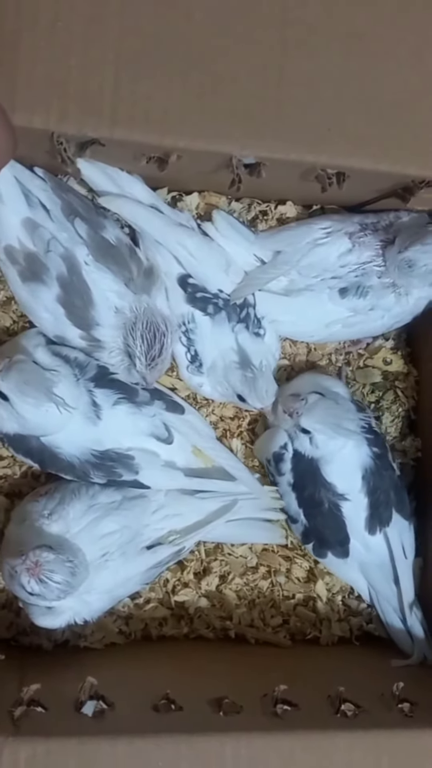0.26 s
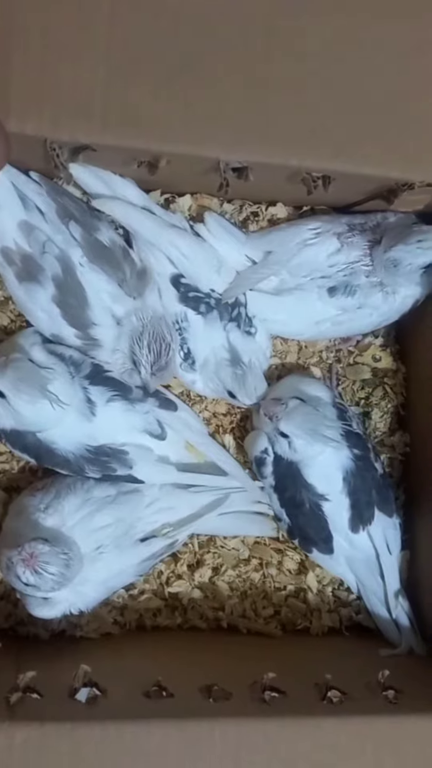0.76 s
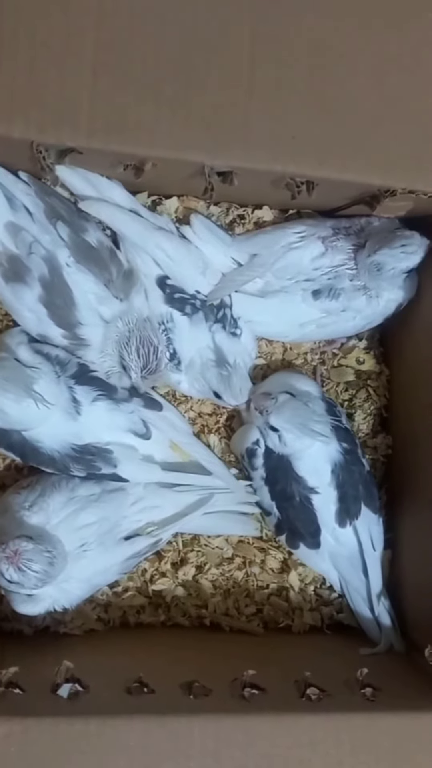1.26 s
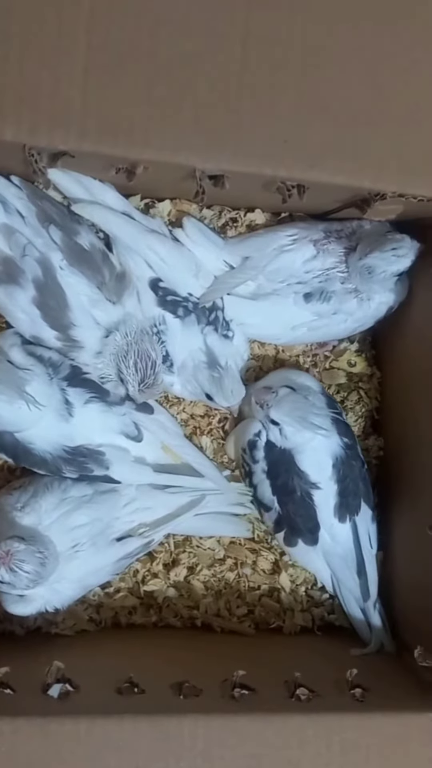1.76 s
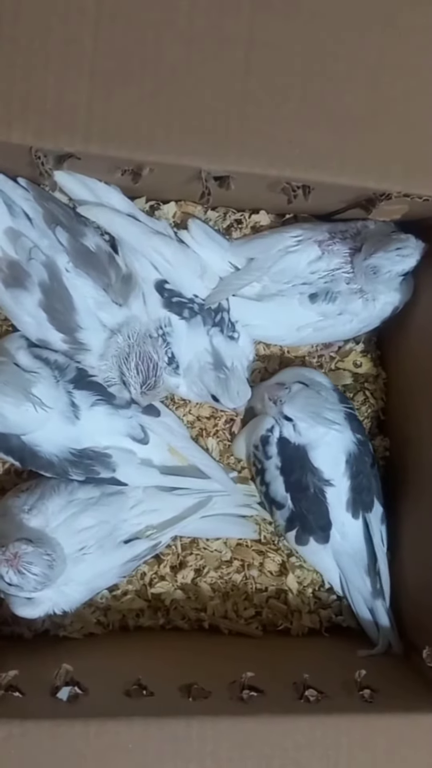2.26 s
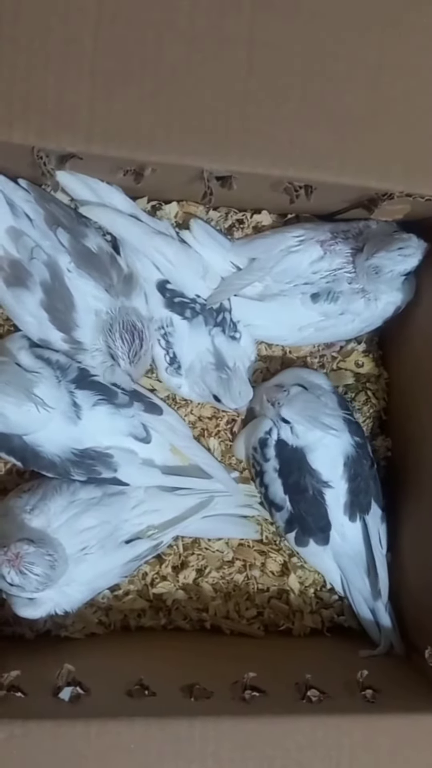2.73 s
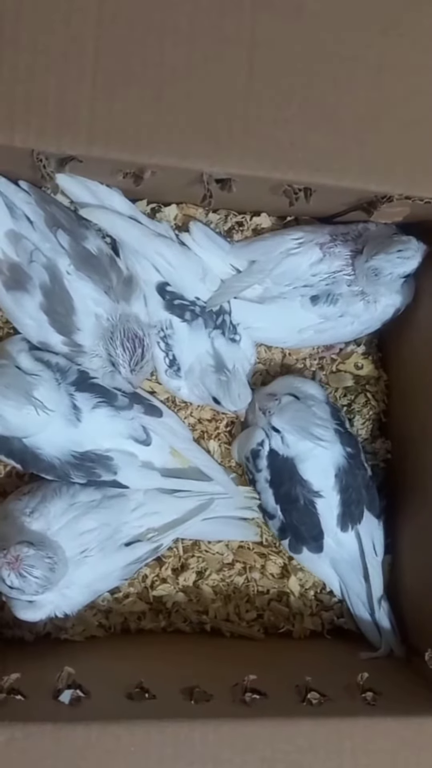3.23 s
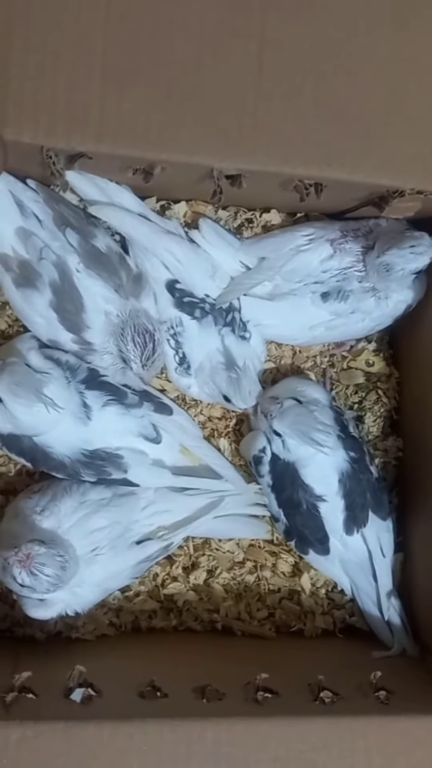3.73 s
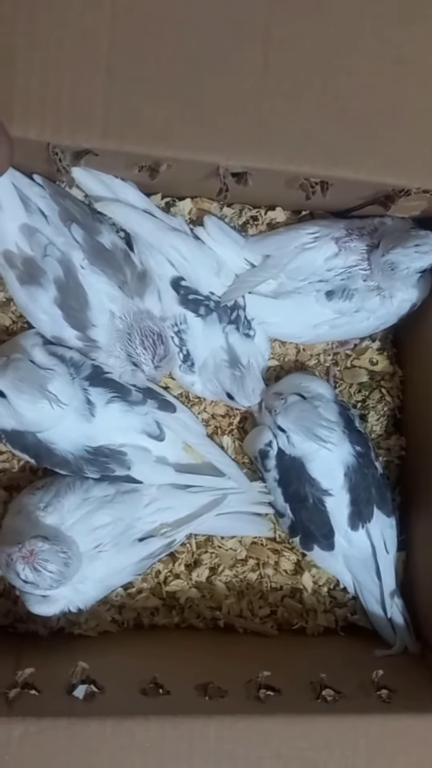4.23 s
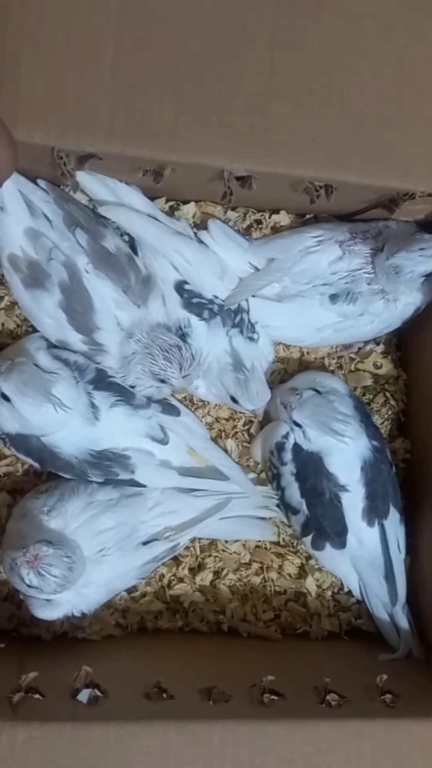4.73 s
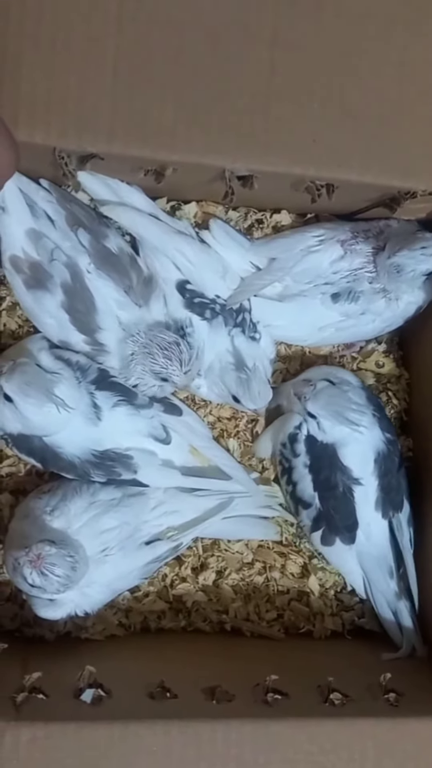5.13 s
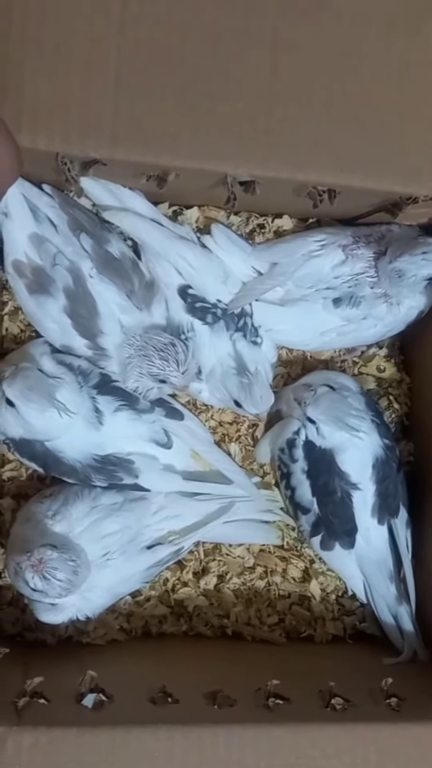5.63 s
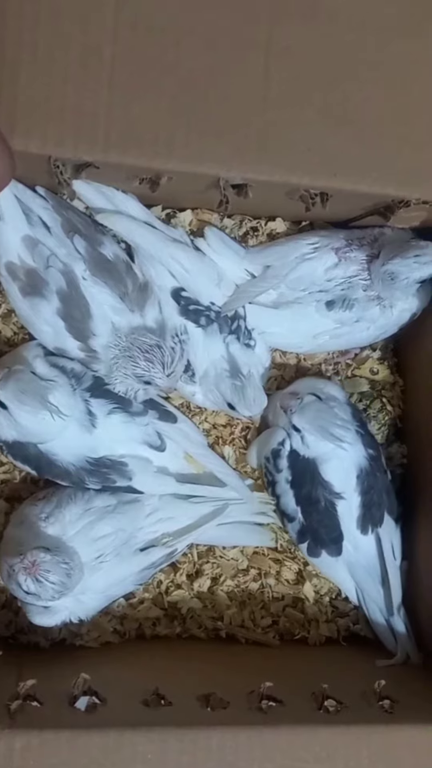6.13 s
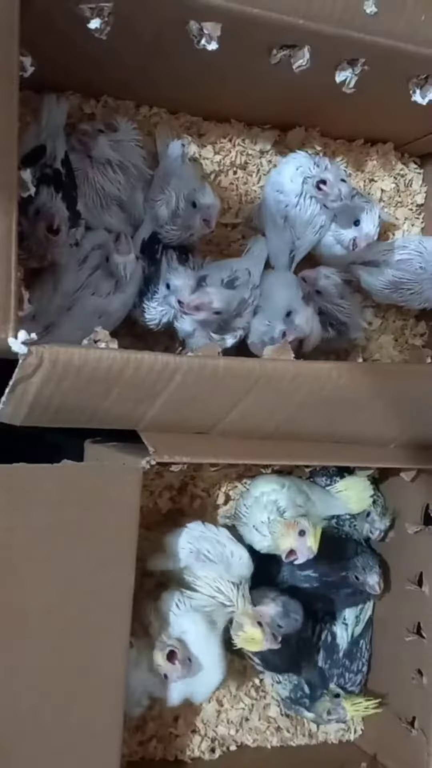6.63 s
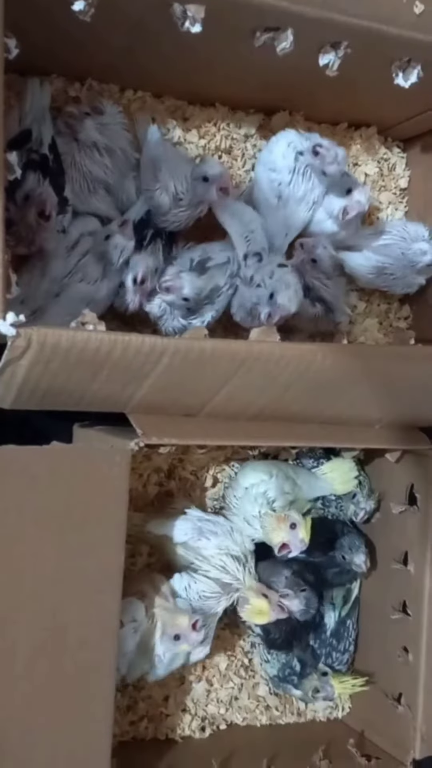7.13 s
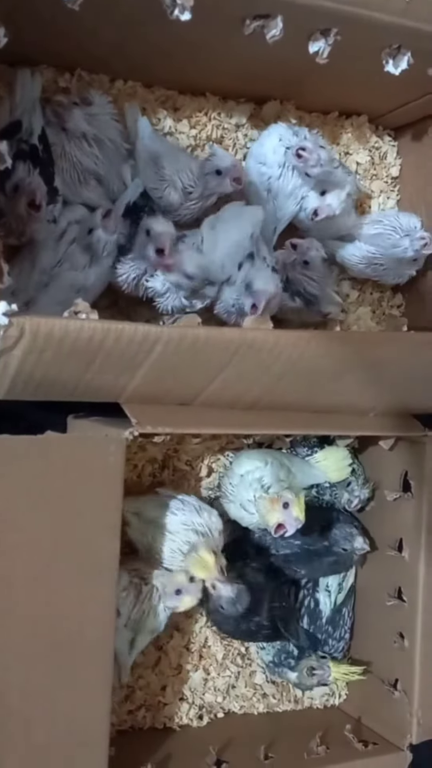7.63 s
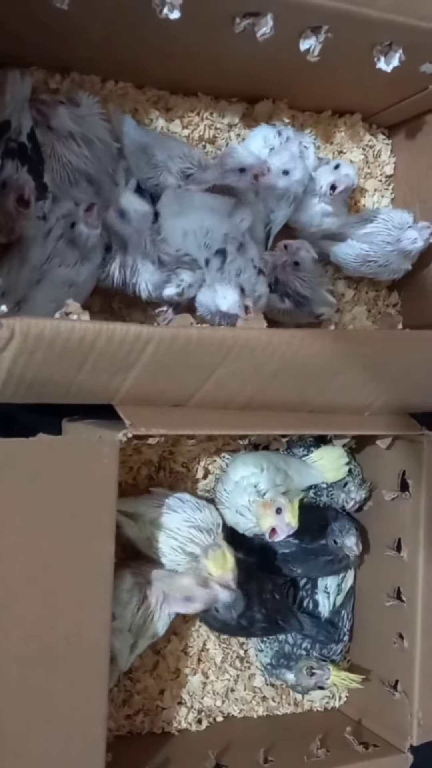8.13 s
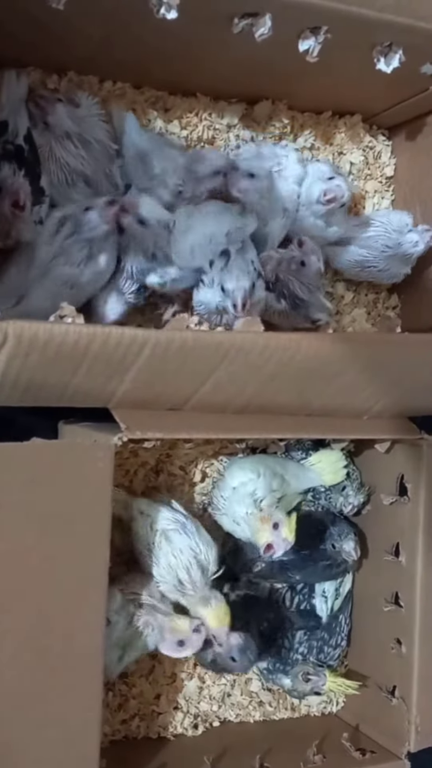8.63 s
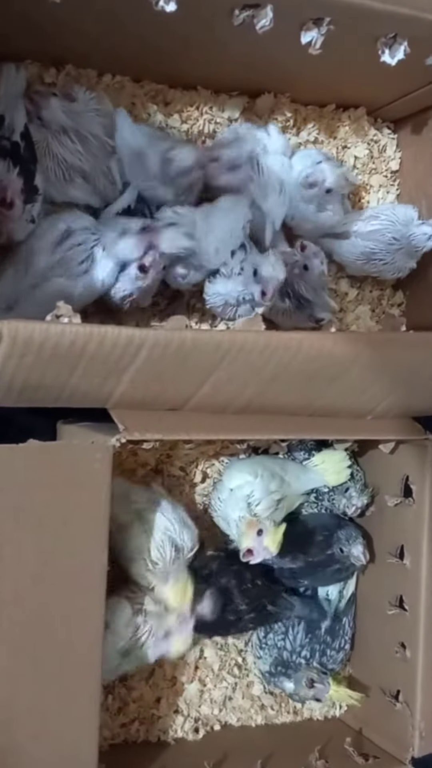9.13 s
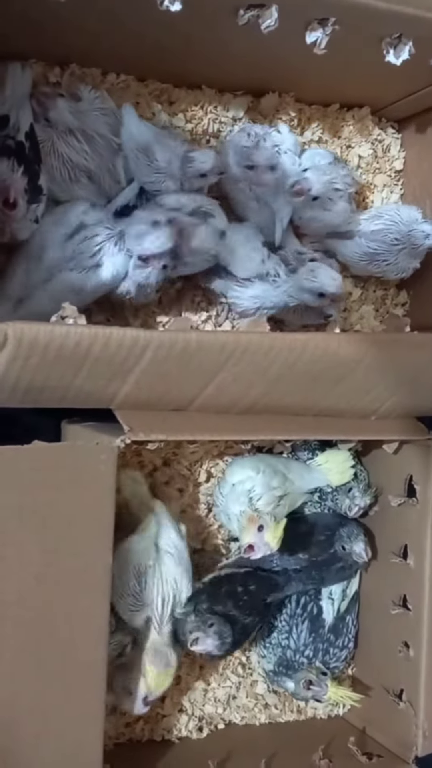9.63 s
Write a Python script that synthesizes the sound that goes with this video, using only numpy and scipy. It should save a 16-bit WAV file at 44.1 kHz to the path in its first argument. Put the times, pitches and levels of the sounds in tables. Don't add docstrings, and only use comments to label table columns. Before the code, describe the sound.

From the start, parrot chicks in a cardboard box beg at close range with overlapping hoarse, fluttering rasps, like fast rattling wheezes, low-throated and shrill together. A falling chirp and beak tick come at about 0.6 s; the chorus surges, then weakens after 2.4 s. Near 2.9 to 3.1 s short peeps glide up and down. From 3.1 to 3.9 s the nearest chick squalls four times, each begun by a sharp falling whistle and beak snap, the last longest. Rasping rebuilds from 3.9 s with thin peeps around 4.2 to 4.5 s, a lone squall at 5.3 s, and a clipped one at 6.45 s. Silence falls around 6.55 s. From about 6.65 s to the end, a farther, quieter crowd rasps steadily, easing around 8.4 s, with brief calls, faint chirps, airy hiss and low hum. Mains hum, fan tone and rumble lie faintly beneath the first part.

```python
import sys
import numpy as np
from scipy import signal
from scipy.fft import rfft, irfft, next_fast_len
from scipy.io import wavfile
from scipy.ndimage import uniform_filter1d, map_coordinates

SR = 44100
rng = np.random.default_rng(int(sys.argv[2]) if len(sys.argv) > 2 else 0)


def generate_wav(signal):
    frames = np.transpose(np.atleast_2d(signal))
    scaled = np.clip(frames, -1, 1) * 32767
    pcm = np.round(scaled).astype(np.int16)
    wavfile.write(sys.argv[1], SR, pcm)


def invert_db(x):
    u = np.asarray(x, float) / 20
    return 10 ** u


N = 436149
SECOND_VIEW_S = 6.58
SIDES = np.array([[1], [-1]])


def unit(x):
    return x / np.sqrt(np.mean(np.atleast_2d(x).mean(0) ** 2) + 1e-20)


def along(points, hz):
    f, v = np.transpose(points)
    return np.interp(np.log(hz + 1), np.log(f + 1), v)


def curves(rows, t=None):
    s, *cols = np.transpose(np.vstack(rows))
    t = np.arange(N) / SR if t is None else t
    return [np.interp(t, s, c) for c in cols]


def wobble(rate):
    knots = rng.standard_normal(int(N * rate / SR) + 4)
    return map_coordinates(knots, [np.arange(N) * rate / SR], order=1)


def filtered(x, response):
    m = next_fast_len(N + 4096)
    return irfft(rfft(x, m) * response(np.fft.rfftfreq(m, 1 / SR)), m)[..., :N]


def ports(x, lead_s, pan_db):
    return filtered(x, lambda f: invert_db(SIDES * pan_db / 2) * np.exp(1j * np.pi * f * lead_s * SIDES))


# (time [s], level [dB])
HUM_SWELL = [
    [(0.0, -73.5), (0.31, -85.5), (0.34, -68), (0.91, -53), (2.23, -62.5), (3.05, -51.5)],
    [(3.65, -56.5), (3.92, -48), (4.67, -71.5), (5.59, -48), (6.41, -54.5), (6.5, -75)],
    [(6.7, -53), (6.98, -59), (7.15, -50), (7.28, -55.5), (9.75, -55.5), (9.89, -63.5)],
]
# (frequency [Hz], density [dB per Hz])
RUMBLE_SPECTRUM = [(15, -41.5), (28, -35), (69, -8.5), (96, -6.5), (124, -0.5), (147, 0), (201, -8.5),
                   (465, -4), (520, -20), (580, -23), (690, -13), (900, -19), (1170, -29), (1980, -120)]
# (frequency [Hz], level [dB], left-right [dB])
FAN_TONES = [
    (448, -57.5, 4),
    (224.8, -65, 0),
]
MAINS_HZ, DRONE_HZ, DRONE_DB = 120, 70, -78.5
RUMBLE_DB, RUMBLE_FAR_DB, RUMBLE_FOLLOWS = -58, -62.5, 0.24
DUCK_DB, DUCK_S, DUCK_LATE_S = -11, 0.036, 0.0044


def room():
    t = np.arange(N) / SR
    second = t > SECOND_VIEW_S
    duck_db = DUCK_DB * sum(np.exp(-((t - s + DUCK_LATE_S) / DUCK_S) ** 2) for s, *_ in SOLO)
    swell_db, = curves(HUM_SWELL)
    hum_phase = 2 * np.pi * MAINS_HZ * t + .7 * wobble(6)
    hum = invert_db(swell_db + duck_db - 2.5) * np.sqrt(2) * np.sin(hum_phase)

    blades = 0
    for hz, db, pan_db in FAN_TONES:
        level = invert_db(db + 1.9 * wobble(4.0) + pan_db * SIDES)
        blades = blades + level * np.sqrt(2) * np.sin(2 * np.pi * hz * t + 0.1 * wobble(3.9))
    buzz = invert_db(-66.5) * np.sin(2 * np.pi * 306.8 * t) * second * (t < 8.3)

    mid, side = filtered(rng.standard_normal((2, N)), lambda f: invert_db(along(RUMBLE_SPECTRUM, f)))
    rumble = unit(np.array([mid + 0.2 * side, mid - 0.6 * side]))
    rumble_db = np.where(second, RUMBLE_FAR_DB, RUMBLE_DB)
    rumble_db = rumble_db + RUMBLE_FOLLOWS * (swell_db - swell_db.mean()) + duck_db
    street = rng.standard_normal((2, N)) + 2.9 * mid
    drone = unit(filtered(street, lambda f: f / (30 + f) / (1 + (f / DRONE_HZ) ** 4)))
    drone = invert_db(DRONE_DB) * second * drone
    return drone + hum + blades * (t < SECOND_VIEW_S) + buzz + invert_db(rumble_db + 3.5) * rumble


def flutter(rate, scatter_db, breath, clack):
    wavering_hz = rate * invert_db(1.8 * wobble(4) + .8 * wobble(90))
    beats = np.floor(np.cumsum(wavering_hz / SR))
    slaps = np.diff(beats, prepend=0) * invert_db(scatter_db * rng.standard_normal(N))
    puffs = signal.lfilter([1], [1, -np.exp(-1 / (.0007 * SR))], slaps)
    air = unit((breath + unit(puffs)) * rng.standard_normal(N))
    return unit(air + clack * unit(slaps))


# (time [s], crop [Hz], windpipe [Hz], beak [Hz], left-right [dB])
MOUTH_RINGS = [(0.0, 2525, 4350, 5050, 3.5), (0.59, 1830, 4080, 4820, 5.5), (0.81, 2550, 3840, 4950, -2.5),
               (1.36, 2340, 4170, 4280, -3), (1.65, 2120, 4220, 5780, 1), (2.47, 2220, 4010, 5420, -5.5),
               (2.76, 1514, 4130, 5660, 5), (3.08, 1930, 4200, 5480, 3.5), (3.14, 2650, 3600, 5060, -6),
               (3.8, 2250, 3920, 4830, -19.5), (3.88, 2240, 4090, 4950, -1.5), (4.8, 1925, 4340, 5180, 0.5),
               (5.4, 2155, 3690, 5220, 0), (5.8, 1950, 4350, 6060, -1.5), (6.5, 1914, 4000, 5290, 4.5),
               (8.32, 1980, 4360, 6200, 17), (9.11, 1965, 3980, 5180, 2.5), (9.89, 1790, 4020, 5500, 4.5)]
SHARP_DB, SHARP_WAVERS_DB = 3.5, 0.5


def throat(z, spectrum, column, width_hz, ring_db, patchy_db):
    hz, t = np.fft.rfftfreq(512, 1 / SR), np.arange(z.shape[-1]) * 256 / SR
    ring_hz = curves(MOUTH_RINGS, t)[column]
    at = np.minimum(np.int64(t * SR), N - 1)
    peak = invert_db(ring_db + SHARP_DB + SHARP_WAVERS_DB * wobble(2.6)[at])
    ring = peak / (1 + ((hz[:, None] - ring_hz) / width_hz) ** 2) ** 2
    field = uniform_filter1d(rng.standard_normal(z.shape[-2:]), size=16, axis=1)
    streaks = invert_db(patchy_db * np.where(t > SECOND_VIEW_S, .7, 1) * field / field.std())
    gain = invert_db(along(spectrum, hz))[:, None] * (1 + ring) * streaks
    gain /= np.sqrt(np.mean(gain ** 2, axis=0))
    return unit(signal.istft((z * gain).astype(np.complex64), SR, nperseg=512)[1][:, :N])


ATTACK_S, SHRILL_ATTACK_S, RELEASE_S = .012, 0.0062, 0.012


def calls(rows, colour=None, attack_s=ATTACK_S):
    power = np.zeros(N)
    for row in rows:
        s, end, db, swell_db = row[:4]
        length = end - s
        t = np.arange(round((length + RELEASE_S) * SR)) / SR
        opening = t / attack_s + (s <= 0)
        closing = 1 + (length - t) / RELEASE_S
        edge = np.clip(np.minimum(opening, closing), 0, 1)
        level_db = db + swell_db * (t / length - .5) + (row[colour] if colour else 0)
        span = power[round(max(s, 0) * SR):][:len(t)]
        span += (edge * invert_db(level_db))[:len(span)] ** 2
    return power


# (start [s], end [s], level [dB], swell [dB], chest tone [dB])
DEEP_CALLS = [(0.0, .62, -30.5, -2.5, -3.5), (.615, 1.54, -33.5, 4, -3.5), (1.53, 1.745, -33.5, -4.5, 0.5),
              (1.735, 2.43, -33.5, 2, 2.5), (2.415, 2.67, -37, 5, 1), (2.675, 2.935, -40, -2, 5),
              (2.93, 3.09, -47, -2, -1.5), (3.12, 3.25, -44, 4.5, -5), (3.28, 3.395, -51, 13.5, -0.5),
              (3.48, 3.56, -51, 4.5, 11), (3.67, 3.785, -41, -10.5, -8.5), (3.78, 4.015, -35.5, 2, -1.5),
              (4.01, 4.17, -43.5, -5.5, -5), (4.16, 4.555, -35.5, 8, -2), (4.545, 5.285, -33.5, -2, 3),
              (5.285, 5.45, -37.5, 16.5, -5), (5.44, 5.62, -37.5, 8.5, -2.5), (5.615, 5.66, -43.5, 0.5, -2),
              (5.655, 6.425, -34.5, 3.5, -3), (6.43, 6.515, -37, -2, -6.5)]
# (start [s], end [s], level [dB], swell [dB], windpipe over beak [dB])
SHRILL_CALLS = [(0.0, .43, -31, -1, 1), (.432, .622, -28.5, 2, -0.6), (.625, .82, -38, -5, 0),
                (.822, .915, -36, 2.5, -6), (.92, 1.5, -33, 5, -7.5), (1.502, 1.735, -35.5, -7, -5),
                (1.737, 2.43, -34.5, 1.5, -2), (2.435, 2.672, -37, 11, -1.5), (2.678, 2.895, -43, -4, -0.5),
                (2.904, 2.937, -29, -3, -5.5), (2.94, 3.085, -41, -5, -6), (3.855, 4.015, -34, 2.5, -9.5),
                (4.02, 4.165, -48.5, 2.5, -8.5), (4.168, 4.545, -37.5, 10.5, -1),
                (4.55, 5.105, -34.5, 3.5, -0.3), (5.108, 5.24, -32, -3.5, -3.5),
                (5.243, 5.267, -34.5, 1.5, -5), (5.273, 5.284, -21.5, -3, -9.5),
                (5.458, 5.62, -36.5, 3.5, -8), (5.615, 5.64, -49.5, -7.5, -2.5),
                (5.659, 5.667, -26.5, 1, -11.5), (5.672, 5.705, -32.5, -0.5, -11.5),
                (5.707, 5.785, -39.5, -2.5, -3.5), (5.787, 6.3, -30, 6, -8), (6.302, 6.41, -31.5, -8, -2.5),
                (6.412, 6.43, -28, 9.5, -4)]
# (time [s], level [dB])
FAR_CLAMOUR = [(6.6, -46.5), (6.8, -44), (7.1, -43), (7.95, -42.5), (8.4, -48.5), (8.85, -46), (9.2, -44.5),
               (9.89, -46)]
# (start [s], end [s], level [dB], swell [dB])
FAR_BOX_CALLS = [(8.0, 8.05, -54.5, -8), (8.07, 8.112, -55, 7), (8.17, 8.19, -44.5, -4.5),
                 (8.22, 8.257, -49, 8), (8.33, 8.35, -45, -7), (8.49, 8.56, -47, -9.5),
                 (8.89, 8.95, -50, 0), (8.98, 9.01, -47.5, -1.5), (9.03, 9.085, -45, -0.5),
                 (9.16, 9.215, -48, 4), (9.27, 9.33, -48, -12), (9.355, 9.397, -44, -4),
                 (9.5, 9.547, -49.5, -1), (9.64, 9.687, -45.5, -1.5), (9.82, 9.868, -43, -2.5)]
# (crop [dB], windpipe [dB], beak [dB])
REST_DB = (-54.5, -43.5, -46.5)
# (crop [dB], windpipe [dB], beak [dB])
FAR_COLOUR_DB = (1.56, -1.5, 0)
SQUALL_START_DB = [-24, -26, -26, -25.5, -23, -24.5]
SQUALL_BEAK_DB = [-1.5, 1.5, 0.5, 0, 0.7, 1]
SQUALL_FADE_DB_PER_S = -33.5


def efforts():
    solo = []
    for (s, end, _, _), db, beak_db in zip(SOLO, SQUALL_START_DB, SQUALL_BEAK_DB):
        fade_db = SQUALL_FADE_DB_PER_S * (end - s)
        solo.append((s, end - .012, db + fade_db / 2, fade_db, beak_db))
    crop = calls(DEEP_CALLS)
    pipe = calls(SHRILL_CALLS, 4, SHRILL_ATTACK_S) + calls(solo)
    beak = calls(SHRILL_CALLS, None, SHRILL_ATTACK_S) + calls(solo, 4)
    far = calls(FAR_BOX_CALLS) + invert_db(2 * curves(FAR_CLAMOUR)[0])
    second = np.arange(N) / SR > SECOND_VIEW_S
    return [10 * np.log10(np.where(second, far * invert_db(2 * tone), power + invert_db(2 * rest)))
            for power, rest, tone in zip([crop, pipe, beak], REST_DB, FAR_COLOUR_DB)]


def chest(crop):
    rest = invert_db(2 * REST_DB[0])
    gain = np.sqrt((calls(DEEP_CALLS, colour=4) + rest) / (calls(DEEP_CALLS) + rest))
    return crop + (gain - 1) * filtered(crop, lambda f: 1 / (1 + (f / 1340) ** 6))


# (frequency [Hz], density [dB per Hz])
CROP_BAND = [(450, -45), (650, -31), (900, -22), (1300, -9), (1680, -3.5), (1830, -10), (2100, -4.5),
             (2290, -8.5), (2600, -1), (2880, -8.5), (3060, -11), (3300, -18), (3700, -60)]
# (frequency [Hz], density [dB per Hz])
PIPE_BAND = [(2750, -34), (3020, -12), (3230, -5.5), (3500, 0), (4100, -3.5), (4500, -13), (4900, -44.5)]
# (frequency [Hz], density [dB per Hz])
BEAK_BAND = [(3800, -31.5), (4400, 1), (5600, -0.5), (6000, -4), (6500, -13.5), (6900, -32.5),
             (7300, -78.5)]
# (frequency [Hz], density [dB per Hz])
SHEEN_BAND = [(6600, -53.5), (7600, -14.5), (8400, -4.5), (9400, 1.5), (10200, -6), (11300, -13.5),
              (12500, -17.5), (13400, -55.5)]
# (frequency [Hz], density [dB per Hz])
AIR_BAND = [(300, -27), (600, -7), (1000, -5.5), (3000, -11.5), (6500, -11.5), (7250, -16.5), (7600, -16.5),
            (8000, -19), (10200, -19), (11000, -15.5), (13100, -18.5)]
# (time [s], length [s], depth [dB])
THROAT_GASPS = [(2.896, 0.0055, -4), (3.104, 0.0068, -5.5), (3.253, 0.0052, -0.5), (3.395, 0.013, -2.5),
                (3.549, 0.006, -12.5), (5.262, 0.0044, -2), (5.293, 0.003, -4.5), (5.646, .012, -5),
                (6.435, 0.004, -19.5)]


def brood():
    t = np.arange(N) / SR
    near = flutter(rate=190, scatter_db=2.8, breath=1.5, clack=.8)
    wall = near + 0.12 * np.roll(near, round(.00237 * SR))
    others = [flutter(rate=260, scatter_db=2.2, breath=2.2, clack=.5) for port in range(2)]
    hz, frames, z = signal.stft(np.float32([unit(wall), *others]), SR, nperseg=512)

    def wind(near_crowd, lead_s):
        crowd = np.where(frames > SECOND_VIEW_S, 3, near_crowd)
        lead = np.exp(1j * np.pi * lead_s * np.outer([1, -1], hz))[:, :, None]
        return (lead * z[0] + crowd * z[1:]) / np.hypot(1, crowd)

    low_wind = wind(1.05, .00014)
    high_wind = wind(.95, .000175)
    crop_db, pipe_db, beak_db = efforts()
    side = SIDES / 2
    crop = throat(low_wind, CROP_BAND, column=0, width_hz=420, ring_db=-6.5, patchy_db=3.5)
    crop = invert_db(crop_db - 2.7 * side) * crop
    pipe = throat(high_wind, PIPE_BAND, column=1, width_hz=260, ring_db=-2.0, patchy_db=5)
    pipe = invert_db(pipe_db - 2.7 * side) * pipe
    beak = throat(high_wind, BEAK_BAND, column=2, width_hz=760, ring_db=-10.5, patchy_db=4)
    beak = invert_db(beak_db + 4.86 * side) * beak

    effort = np.sqrt(invert_db(2 * crop_db) + invert_db(2 * pipe_db) + invert_db(2 * beak_db))
    sheen = throat(low_wind, SHEEN_BAND, column=2, width_hz=730, ring_db=-47.0, patchy_db=7)
    sheen = invert_db(-39.5) * effort * (effort / 0.033) ** 0.29 * sheen
    air = throat(z[1:], AIR_BAND, column=2, width_hz=400, ring_db=-43.5, patchy_db=1.5)
    air = invert_db(-52.5 + 0.22 * wobble(22)) * (t > SECOND_VIEW_S) * air

    solo, on = squall(pipe_db, beak_db)
    voices = (1 - 0.48 * on) * chest(crop) + (1 - .72 * on) * (pipe + beak + sheen) + solo
    shut_db = sum(db * np.exp(-((t - s) / length) ** 4) for s, length, db in THROAT_GASPS)
    waver_db = 1.0 * wobble(25) + 0.9 * (t > 7.8) * wobble(32)
    pan_db = 0.3 * side * curves(MOUTH_RINGS)[3]
    return invert_db(shut_db + waver_db + pan_db) * voices + air


# (start [s], end [s], centre [Hz], half width [Hz])
BAND_HOLLOWS = [(0, .35, 1800, 50), (0.039, .1, 2980, 100), (0.257, .31, 3200, 170), (.44, .5, 3130, 100),
                (0.71, 0.746, 2940, 100), (0.786, 0.918, 2960, 79), (0.826, .93, 3320, 70),
                (1.05, 1.14, 3150, 170), (1.2, 1.31, 3120, 170), (1.38, 1.45, 3300, 150),
                (1.66, 1.777, 3150, 140), (1.784, 1.85, 2920, 89), (1.865, 1.93, 3250, 170),
                (2.02, 2.43, 1860, 50), (2.1, 2.206, 3080, 150), (2.27, 2.315, 3170, 200),
                (2.48, 2.6, 3220, 110), (2.72, 2.873, 3280, 160), (3.42, 3.5, 4330, 110),
                (3.43, 3.763, 2000, 110), (3.6, 3.68, 4480, 120), (3.62, 3.82, 4650, 60),
                (3.16, 3.23, 4100, 70), (3.28, 3.39, 4460, 60), (4.136, 4.3, 3280, 170),
                (4.314, 4.45, 1800, 60), (4.41, 4.45, 3070, 180), (4.8, 4.9, 3100, 109),
                (5.03, 5.135, 3260, 200), (5.253, 5.289, 3125, 129), (5.32, 5.36, 4250, 130),
                (5.95, 6.066, 3450, 100), (5.591, 5.623, 3250, 150), (5.665, 5.697, 3220, 180),
                (5.83, 6.027, 3140, 131), (6.27, 6.348, 3440, 90), (8.027, 8.14, 3550, 40),
                (8.04, 8.15, 3050, 40), (8.25, 8.33, 2900, 70), (8.3, 8.35, 3380, 60),
                (8.39, 8.44, 3700, 60), (8.43, 8.48, 3270, 60), (9.22, 9.3, 4470, 40),
                (9.56, 9.64, 4350, 50), (9.56, 9.68, 2650, 45), (8.545, 8.62, 3500, 120),
                (9.1, 9.35, 2930, 70), (9.68, 9.8, 2920, 80)]
HOLLOW_DB = -24


def hollows(hz, t):
    sink = np.zeros((len(hz), len(t)))
    for s, end, centre_hz, width_hz in BAND_HOLLOWS:
        valley = np.exp(-((hz - centre_hz) / width_hz) ** 4)
        presence = np.clip(np.minimum(t - s, end - t) / 0.021 + .5, 0, 1)
        sink += np.outer(valley, presence)
    return np.float32(invert_db(HOLLOW_DB * sink))


# (start [s], end [s], start [Hz], end [Hz], lift [dB])
THROAT_STRANDS = [(0, 0.203, 2460, 2580, 4.5), (0, 0.447, 1580, 1700, 2.5), (0.483, 0.76, 1610, 1650, 4),
                  (0, .62, 4080, 3980, 2.5), (.05, 0.353, 5100, 5100, 5), (.36, .62, 4900, 4970, 5.5),
                  (.91, 1.448, 2610, 2700, 5.5), (1.3, 1.495, 2120, 2060, 2.5),
                  (1.758, 2.42, 2100, 2120, 2), (1.804, 2.42, 2500, 2400, 1.5),
                  (2.737, 2.887, 1400, 1440, 5), (3.6, 3.72, 3960, 3900, 4.5), (4.2, 4.39, 4020, 4300, 4),
                  (4.404, 4.545, 4980, 5000, 5), (4.453, 4.537, 4800, 4560, 6),
                  (4.567, 5.03, 5500, 5700, 4.5), (5.33, 5.42, 3460, 3465, 2.5),
                  (5.32, 5.45, 4660, 4440, 6), (5.647, 5.825, 1590, 1490, 5), (6.132, 6.266, 1550, 1610, 5),
                  (6.18, 6.31, 3060, 3040, 11), (7.804, 8.02, 1390, 1550, 4), (7.88, 8.12, 3860, 3950, 1),
                  (8.003, 8.058, 5600, 5700, 8), (8.14, 8.375, 4200, 4460, 5.5),
                  (8.223, 8.42, 5770, 5500, 8), (8.48, 8.57, 2320, 2300, 7), (8.665, 8.81, 2000, 1870, 2),
                  (8.886, 9.12, 3920, 3750, 3.5), (8.886, 9.077, 2000, 1940, 4.5),
                  (9.15, 9.27, 3800, 3700, 3), (9.19, 9.4, 1990, 1980, 2), (9.24, 9.46, 1510, 1500, 3.5),
                  (9.35, 9.4, 4500, 5000, 4), (9.52, 9.55, 5500, 5550, 2), (9.603, 9.804, 4100, 3870, 4),
                  (9.62, 9.893, 2460, 2450, 6), (9.7, 9.89, 1530, 1480, 3.5), (9.824, 9.865, 5870, 5400, 6)]
STRAND_HALF_WIDTH_HZ = 160


def strands(hz, t):
    lift = np.zeros((len(hz), len(t)))
    for s, end, hz0, hz1, db in THROAT_STRANDS:
        live = (t > s - .01) & (t < end + .01)
        centre = hz0 + (hz1 - hz0) * (t[live] - s) / (end - s)
        lift[:, live] += db * np.exp(-((hz[:, None] - centre) / STRAND_HALF_WIDTH_HZ) ** 2)
    return np.float32(invert_db(lift))


def threads(hz, t):
    field = uniform_filter1d(rng.standard_normal((len(hz), len(t))), size=6, axis=1)
    depth_db = 2.0 * (hz > 1000)[:, None]
    mean_power_db = depth_db ** 2 * np.log(10) / 20
    return np.float32(invert_db(depth_db * field / field.std() - mean_power_db))


# (time [s], length [s], start [Hz], peak [dB])
FALLING_CHIRPS = [(0.619, 0.0036, 5230, -14), (0.62, 0.011, 3960, -19), (2.663, 0.013, 6160, -24.5),
                  (2.664, 0.01, 4690, -21.5), (3.105, 0.013, 5730, -16), (3.113, .016, 3860, -28.5),
                  (3.258, 0.014, 5760, -14), (3.268, 0.026, 3914, -20), (3.408, 0.015, 5670, -15),
                  (3.418, 0.0098, 4410, -28), (3.567, 0.014, 5740, -13.5), (3.577, .012, 4020, -16),
                  (5.297, 0.014, 5820, -16.5), (5.301, 0.014, 3816, -18.5), (6.423, 0.006, 6220, -23),
                  (6.441, .012, 5260, -12.5), (6.451, 0.011, 3540, -16.5), (7.316, 0.011, 5730, -33),
                  (8.246, .01, 5900, -38.5), (9.53, .012, 5900, -36.5), (9.842, 0.011, 6200, -36.5)]
# (time [s], length [s], start [Hz], end [Hz], peak [dB])
GLIDING_PEEPS = [
    (2.914, 0.022, 5020, 5970, -20.5),
    (2.981, 0.073, 4330, 6200, -32),
    (3.047, 0.054, 6020, 5510, -31.5),
    (3.514, 0.049, 3970, 5900, -29),
    (4.184, 0.022, 4090, 4120, -28.5),
    (4.234, 0.034, 4000, 4140, -28.5),
    (4.283, .03, 4240, 4160, -26.5),
    (4.313, 0.025, 4120, 4210, -26.5),
    (4.4, .05, 4840, 4920, -32),
    (4.47, 0.066, 4590, 4460, -27),
]
SLIDE_OCT_PER_S = 25


def yelps():
    out, hoarse, waver = np.zeros(N), wobble(500), wobble(300)
    slides = [(s, length, hz, hz * 2 ** (-SLIDE_OCT_PER_S * length), db)
              for s, length, hz, db in FALLING_CHIRPS]
    for s, length, hz0, hz1, db in [*slides, *GLIDING_PEEPS]:
        u, at = np.linspace(0, 1, round(length * SR)), round(s * SR)
        rough = min(length / 0.065, 1)
        hz = hz0 + (hz1 - hz0) * u + 80 * rough * waver[at:][:len(u)]
        phase = 2 * np.pi * np.cumsum(hz) / SR
        arch = np.sin(np.pi * u ** (.4 + .5 * rough)) ** 0.54
        swell = invert_db(db + (2.24 + 2.1 * rough) * hoarse[at:][:len(u)]) * arch
        low_overtones = invert_db(-37.5) * np.sin(2 * phase) + invert_db(-36) * np.sin(3 * phase)
        whistle = np.sin(phase) + invert_db(-40.5) * np.sin(2 * phase) + (hz < 4200) * low_overtones
        out[at:][:len(u)] += swell * whistle
    return ports(out, lead_s=0.00016, pan_db=7.5)


# (time [s], peak [dB])
DRY_SNAPS = [(0.6218, -32), (2.9054, -53.5), (3.105, -42.5), (3.258, -44), (3.4083, -39.5), (3.57, -40.5),
             (3.581, -40.5), (3.6417, -44.5), (5.661, -55), (6.447, -37.5), (6.509, -40), (9.539, -55.5),
             (9.847, -55)]


def snaps():
    out, t = np.zeros(N), np.arange(SR // 100) / SR
    for s, db in DRY_SNAPS:
        out[round(s * SR):][:len(t)] += invert_db(db + 8.5 - 60 * t / 0.0062) * rng.standard_normal(len(t))
    bright = filtered(out, lambda f: (f / 3500) ** 2 / (1 + (f / 3500) ** 2) * (f < 16000))
    return ports(bright, lead_s=.00015, pan_db=2.4)


# (start [s], end [s], start pitch [Hz], end pitch [Hz])
SOLO = [
    (3.113, 3.248, 1739, 1751),
    (3.27, 3.398, 1765, 1740),
    (3.416, 3.548, 1780, 1767),
    (3.586, 3.858, 1808, 1785),
    (5.303, 5.457, 1740, 1715),
    (6.447, 6.517, 1667, 1677),
]
# (multiple of pitch [-], half width [Hz], level [dB])
SQUALL_PARTIALS = [(0.949, 60, -24), (1.35, 299, -24), (1.68, 200, -16.5), (2, 310.3, -3.5),
                   (2.45, 301, -14.5), (2.8, 229, -3.5), (3.08, 139.6, -6.5), (3.951, 259.6, -33.5),
                   (5.2, 301, -46), (6.05, 220, -41.5)]
# (frequency [Hz], level [dB])
SQUALL_TILT = [(1500, 0), (3500, -4), (5200, 4), (9000, 2.5)]


def squall(low_db, high_db):
    t = np.arange(N) / SR
    on = sum(np.clip(np.minimum(t - start, end - t) / 0.017, 0, 1) for start, end, _, _ in SOLO)
    live, voice = on > 0, np.zeros(N)
    pitch_points = [row for a, b, f0, f1 in SOLO for row in ((a, f0), (b, f1))]
    phase = 2 * np.pi * np.cumsum(curves(pitch_points)[0][live]) / SR
    for k, width_hz, db in SQUALL_PARTIALS:
        knots = np.arange(len(phase)) * 2 * width_hz / SR
        a, b = (map_coordinates(rng.standard_normal(int(knots[-1]) + 4), [knots]) for part in range(2))
        shake = a * np.cos(k * phase) + b * np.sin(k * phase)
        band_db = high_db if round(k) in (3, 5) else low_db
        voice[live] += invert_db(db + band_db[live]) * unit(shake)

    def ear(f):
        return invert_db(SIDES * along(SQUALL_TILT, f)) * np.exp(1j * np.pi * f * .00012 * SIDES)

    return filtered(on * voice * invert_db(0.47 * wobble(200)), ear), on


def scene():
    return filtered(brood() + yelps() + room(), lambda f: f < 13100) + snaps()


def masked(x, near_db, far_db):
    hz, t, z = signal.stft(np.float32([x[0] + x[1], x[0] - x[1]]), SR, nperseg=1024)
    z *= hollows(hz, t) * strands(hz, t) * threads(hz, t)
    power = np.abs(z) ** 2
    mean_power = power.mean((0, 1))
    band = uniform_filter1d(uniform_filter1d(power, size=3, axis=1), size=4, axis=2)
    band = band[:, 1::3].repeat(3, axis=1)[:, :len(hz)]
    neighbours = uniform_filter1d(power.sum(0), size=30, axis=0)
    treble_db = np.where(t > SECOND_VIEW_S, far_db + 10.5, far_db)
    treble_floor = mean_power * invert_db(2 * treble_db) * (hz[:, None] > 6800)
    hidden = band < neighbours * invert_db(2 * near_db) + treble_floor
    edge = uniform_filter1d(power, size=8, axis=1)[:, ::8].repeat(8, axis=1)[:, :len(hz)]
    hidden |= (edge < mean_power * invert_db(2 * -13)) & (np.abs(hz[:, None] - 6600) < 400)
    gain = np.where(hidden & (hz[:, None] > 500), np.float32(.012), np.float32(1))
    mid, side = signal.istft(z * gain, SR, nperseg=1024)[1][:, :N]
    return np.array([mid + side, mid - side]) / 2


# (time [s], level [dB])
SCENE_CUT = [
    (6.51, 1),
    (6.512, -18.5),
    (6.54, -70.5),
    (6.55, -120),
    (6.63, -120),
    (6.645, -12),
    (6.7, -3.5),
    (6.76, -1),
]


def roll_off(x):
    return signal.sosfilt(signal.butter(12, 16000, fs=SR, output="sos"), x)


def record(dry):
    kept = masked(dry, near_db=-10.2, far_db=-30)
    mix = kept * invert_db(curves(SCENE_CUT)[0])
    return roll_off(mix)


dry = scene()
out = record(dry)
generate_wav(out)
```